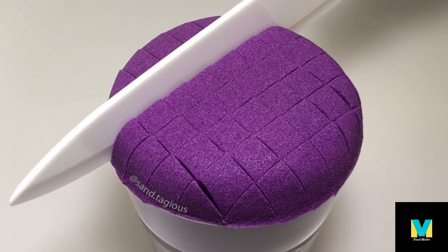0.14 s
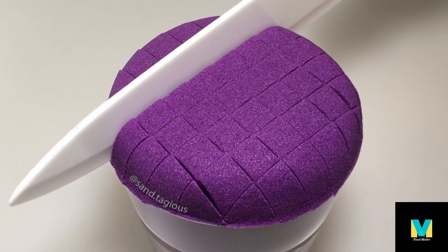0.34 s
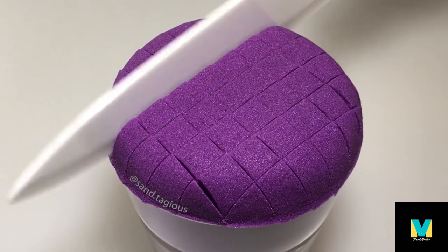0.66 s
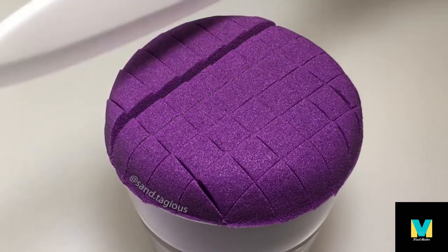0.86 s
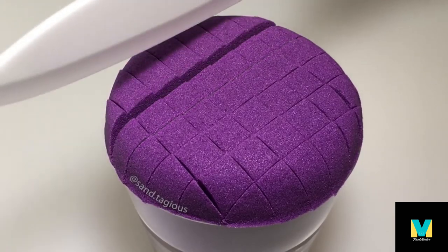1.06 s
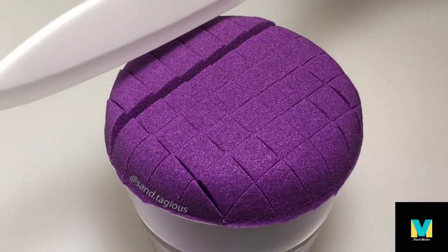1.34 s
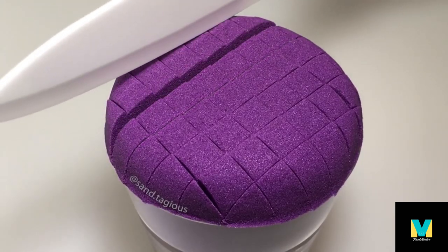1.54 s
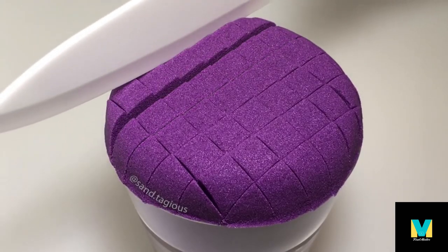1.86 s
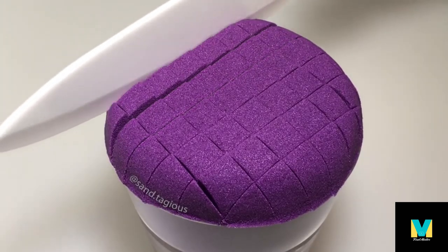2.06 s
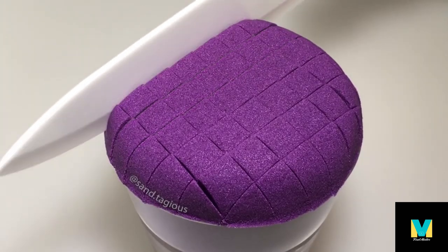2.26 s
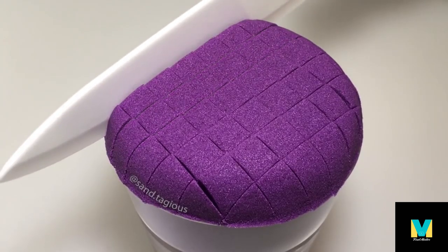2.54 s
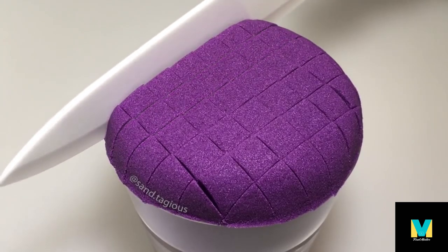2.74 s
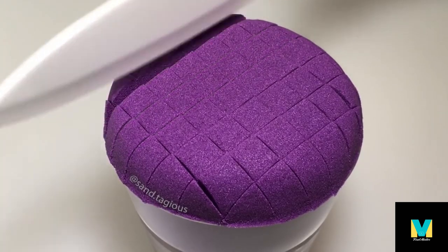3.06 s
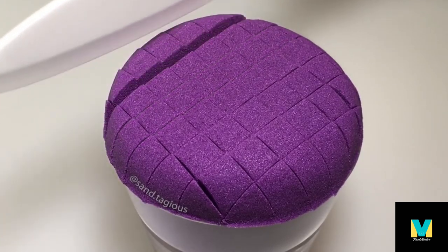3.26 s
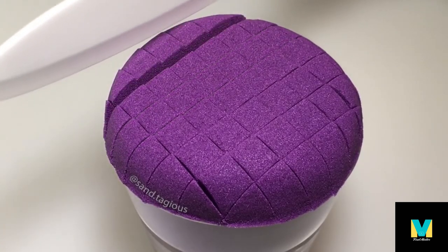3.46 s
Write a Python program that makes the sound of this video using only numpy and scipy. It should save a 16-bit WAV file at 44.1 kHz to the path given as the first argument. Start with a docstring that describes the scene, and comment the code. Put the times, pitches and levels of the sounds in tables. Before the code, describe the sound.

A plastic knife cuts gritty mouldable sand twice, ending in sharp ticks on a cup rim.

```python
"""A quiet small room: a plastic knife presses twice through a cake of mouldable sand on a plastic cup, close up.
Each cut layers a hiss of coloured random grains over a crunch of small slips through a moving resonance.
Filtered clicks and sprays make the rim ticks; soft pushes into decaying modes make the knocks, each with a thud.
Grains also rub faint ringing from the blade as it scrapes. Shaped noise makes the room tone and the deep air.
"""
import sys
import numpy as np
from scipy import signal
from scipy.fft import rfft, irfft, next_fast_len
from scipy.io import wavfile

SR = 44100
rng = np.random.default_rng(int(sys.argv[2]) if len(sys.argv) > 2 else 0)


def wav_record(signal):
    """Record a signal, one row per channel, as 16-bit PCM in the file named by sys.argv[1]."""
    frames = np.transpose(np.atleast_2d(signal))
    bounded = np.clip(frames, -1, 1)
    # unit amplitude maps onto the largest positive 16-bit level
    quanta = np.round(bounded * 32767).astype(np.int16)
    wavfile.write(sys.argv[1], SR, quanta)


N = 160965   # length [samples]
T = np.arange(N) / SR   # time [s]


def from_db(db):
    """Decibels to amplitude gain."""
    return 10 ** (np.asarray(db) / 20)


def rms_one(x):
    """Scale to rms 1."""
    return x / np.sqrt(np.mean(x ** 2) + 1e-20)


def low_pass(x, hz, order=2):
    """Butterworth low-pass."""
    return signal.sosfilt(signal.butter(order, hz, fs=SR, output="sos"), x + 1e-18)


def colour(x, spectrum):
    """Give a steady signal a spectrum, interpolated over log frequency; rms 1."""
    hz, db = np.transpose(spectrum)
    size = next_fast_len(N)
    f = np.maximum(np.arange(size // 2 + 1) * SR / size, .1)
    gain = from_db(np.interp(np.log(f), np.log(hz), db))
    return rms_one(irfft(rfft(x, size) * gain, size)[:N])


def wander(hz):
    """Smooth random motion below a cutoff; spread about 1, extremes clipped."""
    return np.clip(rms_one(low_pass(rng.standard_normal(N), hz)), -2.3, 2.3)


def grains(per_s, spread_db):
    """Random clicks of uneven size and sign, with the same mean power at any rate."""
    chance = np.clip(per_s / SR, 1e-3, 1)
    sizes = from_db(spread_db * np.minimum(rng.exponential(1, N), 5))
    signed = sizes * rng.choice([-1, 1], N)
    happens = rng.random(N) < chance
    return rms_one(signed * happens / np.sqrt(chance))


def clicks(times, db):
    """One single-sample click at each time."""
    out = np.zeros(N)
    out[(np.asarray(times) * SR).astype(int)] = from_db(db)
    return out


def ring(x, modes):
    """Each click sets a bank of decaying sine modes ringing."""
    out = 0
    for hz, db, t60 in modes:
        r = np.exp(-np.log(1000) / (t60 * SR))
        w = 2 * np.pi * hz / SR
        mode = signal.lfilter([0, np.sin(w)], [1, -2 * r * np.cos(w), r * r], x + 1e-18)
        out = out + from_db(db) * mode
    return out


def rubbed(drive, gain, modes):
    """Modes driven by grains under a stroke; they ring on after it."""
    return ring(drive * gain, modes) / np.std(ring(drive, modes))


def resonance(x, hz, width_hz, size=128):
    """A two-pole resonance whose centre follows a curve, updated block by block."""
    out, state = np.zeros(N), np.zeros(2)
    r = np.exp(-np.pi * width_hz / SR)
    for i in range(0, N, size):
        poles = [1, -2 * r * np.cos(2 * np.pi * hz[i] / SR), r * r]
        out[i:i + size], state = signal.lfilter([1, 0, -1], poles, x[i:i + size], zi=state)
    return out


# slow air movement: (time [s], level [dB])
AIR_LEVEL = [(0, -34), (.6, -21), (1.1, -32), (1.6, -41), (2.1, -25.5), (2.5, -28), (3, -22), (3.3, -37),
             (3.65, -31)]
# spectrum of the air: (frequency [Hz], relative level [dB])
AIR_SPECTRUM = [(1, -9.5), (3.5, -2), (8, -7), (20, -31.5), (40, -40.5), (70, -48.5), (150, -69.5),
                (1000, -120)]
# spectrum of the quiet room: (frequency [Hz], relative level [dB])
ROOM_TONE_SPECTRUM = [(20, 1.5), (45, 1), (100, -14), (200, -20), (400, -38), (700, -37), (2000, -42),
                      (6000, -45.5), (11000, -41.5), (16000, -51.5)]
ROOM_TONE_DB, AIR_FADE_S = -58.5, .12


def background():
    """Steady room tone, and the deep sway of air at the microphone, eased in and out."""
    to_nearest_end = np.minimum(T, T[-1] - T)
    ease = np.sin(np.pi / 2 * np.minimum(to_nearest_end / AIR_FADE_S, 1)) ** 2
    sway = from_db(np.interp(T, *np.transpose(AIR_LEVEL)))
    air = ease * sway * colour(rng.standard_normal(N), AIR_SPECTRUM)
    return air + from_db(ROOM_TONE_DB) * colour(rng.standard_normal(N), ROOM_TONE_SPECTRUM)


# faint shifts of the grip, as modes: (frequency [Hz], relative level [dB], t60 [s])
HANDLING_MODES = [(70, -6.5, .06), (135, 2, .05), (215, -13, .04), (350, -7, .1), (430, -9.5, .05),
                  (865, -19.5, .12)]
HANDLING_PER_S, HANDLING_SPREAD_DB = 150, 5
HANDLING_START_DB, HANDLING_SETTLES_DB_PER_S = -69, 1.3


def handling():
    """Faint dull bumps of the hand on the knife, ringing low modes and slowly settling."""
    bumps = low_pass(ring(grains(HANDLING_PER_S, HANDLING_SPREAD_DB), HANDLING_MODES), hz=885)
    return from_db(HANDLING_START_DB - HANDLING_SETTLES_DB_PER_S * T) * rms_one(bumps)


# grain rate: a floor, plus a part given at the reference level that follows force to a power
GRAIN_REF_DB, GRAIN_FLOOR_PER_S, GRAINS_PER_S = -40, 4000, 28000
GRAIN_RATE_LAW, GRAIN_SPREAD_DB = .8, 4.1
# clumping: depth at the reference level, and extra depth per dB of lighter touch
CLUMPS_HZ, CLUMP_DB, CLUMP_GROWTH = 220, .9, .053
WAVER_HZ, WAVER_DB = 22, 2.28   # unsteady hand


def grit(gain):
    """Grains shearing past the blade: dense and even under a hard stroke, sparse and clumped under a light one."""
    force = gain / from_db(GRAIN_REF_DB)
    lightness_db = np.clip(-20 * np.log10(force + 1e-9), 0, 30)
    depth = CLUMP_DB + CLUMP_GROWTH * lightness_db
    power_match_db = depth ** 2 * np.log(10) / 20   # deeper clumps keep the same mean power
    clumps_db = depth * wander(CLUMPS_HZ) - power_match_db
    unsteady = from_db(clumps_db + WAVER_DB * wander(WAVER_HZ))
    rate = GRAINS_PER_S * force ** GRAIN_RATE_LAW + GRAIN_FLOOR_PER_S
    return unsteady * grains(rate, GRAIN_SPREAD_DB)


# the two cuts: (time [s], grain hiss level [dB], crunch level [dB], crunch resonance [Hz])
FIRST_STROKE = [(0, -46.5, -40, 405), (.05, -52, -46, 425), (.11, -49, -42.5, 475),
                (.19, -53.5, -47.5, 452), (.22, -51, -46.5, 433), (.28, -52.5, -47, 445),
                (0.294, -50, -40.5, 490), (.315, -88, -58, 460)]
SECOND_STROKE = [(1.69, -99, -64, 450), (1.76, -74, -66.5, 457), (1.84, -75, -62.5, 425),
                 (1.93, -57, -55, 420), (2.05, -44.5, -44, 305), (2.16, -40.5, -39, 290),
                 (2.24, -39, -36, 400), (2.33, -41, -38.5, 445), (2.4, -45.5, -43, 440),
                 (2.52, -50.5, -50, 454), (2.54, -50, -39, 460), (2.57, -81, -70, 490),
                 (2.63, -80, -77.5, 480)]
# width of the crunch resonance: first cut, second cut [Hz]
CRUNCH_WIDTHS = [47, 128]
# broad shudder of the cake against the crunch, before its pitch loss: first cut, second cut [dB]
CAKE_LEVELS = [-10, 1.5]
# high blade ring against the hiss: first cut, second cut [dB]
CUT_RING_LEVELS = [-11, -8.5]
# spectra of the shearing grains and the shuddering cake: (frequency [Hz], relative level [dB])
HISS_SPECTRUM = [(500, -30.5), (950, -21), (1130, -4.5), (1700, -11), (2300, -5), (3000, -7.5), (4400, -8),
                 (5300, -3.5), (7000, -1.5), (9700, 1.5), (14000, 2.5), (16000, -5)]
CAKE_SPECTRUM = [(30, 1), (70, 1.5), (130, 1.5), (190, -5), (290, -1), (480, -9), (600, -16.5), (780, -9),
                 (930, -40), (2000, -51)]
# high ringing of the blade: (frequency [Hz], relative level [dB], t60 [s])
BLADE_HIGH_MODES = [(2386, -7, 0.019), (3590, -8, .03), (5233, -3, 0.029), (6010, -6.5, .035),
                    (7170, -7, 0.025), (8224, -0.5, .04), (9930, -3, 0.043), (12300, -8, .02),
                    (13600, 1, 0.013)]
SLIPS_PER_S, SLIP_SPREAD_DB = 1800, 3.5
CAKE_LOSS_DB_PER_HZ = .018   # the shudder fades as the resonance climbs


def cut(curve, width_hz, cake_db, ring_db):
    """The blade sinks in: grain hiss, and small slips that shake the cake and its moving resonance."""
    s, hiss_db, crunch_db, hz = np.transpose(curve)
    # silent outside the stroke
    hiss = from_db(np.interp(T, s, hiss_db, left=-np.inf, right=-np.inf))
    push = from_db(np.interp(T, s, crunch_db, left=-np.inf, right=-np.inf))
    sand = hiss * colour(grit(hiss), HISS_SPECTRUM)
    blade = from_db(ring_db) * rubbed(grit(hiss), hiss, BLADE_HIGH_MODES)
    slips = grains(SLIPS_PER_S, SLIP_SPREAD_DB)
    crunch = rms_one(low_pass(resonance(slips, np.interp(T, s, hz), width_hz), hz=700, order=4))
    cake_loss_db = CAKE_LOSS_DB_PER_HZ * np.interp(T, s, hz - hz.min())
    cake = from_db(cake_db - cake_loss_db) * colour(grains(SLIPS_PER_S, SLIP_SPREAD_DB), CAKE_SPECTRUM)
    return sand + blade + push * (crunch + cake)


# light scrapes of the free blade; rise and fall each span 20 dB, and the grain level is before its trims:
# (loudest at [s], rise [s], fall [s], grain level [dB], blade hum level [dB], rim level [dB])
SCRAPE_STROKES = [(.302, .01, .008, -70, -45, -58), (0.798, 0.06, 0.01, -73, -85, -60),
                  (0.836, 0.02, 0.005, -42.5, -45, -40), (0.885, 0.0039, 0.011, -47.5, -43, -42),
                  (1.703, 0.0029, 0.03, -66, -53, -63), (1.715, 0.0034, 0.008, -50, -43, -66),
                  (1.771, 0.0024, 0.035, -60.5, -51, -69), (1.885, 0.046, 0.09, -60.5, -57.5, -89),
                  (2.785, 0.15, 0.12, -65, -90, -58), (3.125, 0.045, 0.023, -53, -50, -54),
                  (3.148, 0.032, 0.013, -52, -44, -57)]
# low ringing of the blade, then ringing of the rim and the cup: (frequency [Hz], relative level [dB], t60 [s])
BLADE_LOW_MODES = [(347, -4, 0.13), (465, 3.5, 0.046), (512, -5.5, 0.15), (815, 5, 0.098), (950, 1, 0.022)]
RIM_MODES = [(449, -3, .02), (680, -9, .015), (1130, -7, .02), (1330, -4, .016), (2030, -7, .012),
             (3100, -7, .005), (4880, -4, .006)]
CUP_MODES = [(342.6, -7, .05), (435, -3.5, 0.052), (527, -3.5, 0.017), (648, -7, 0.038)]
SCRAPE_RING_DB, SCRAPE_HISS_DB = -2.5, 3   # trims on the grain level


def scrapes():
    """The blade brushes the walls of the slit or the rim; the grains set blade, rim and cup ringing."""
    hiss, hum, rim = 0, 0, 0
    for s, rise, fall, grain_db, hum_db, rim_db in SCRAPE_STROKES:
        distance = np.maximum((s - T) / rise, (T - s) / fall)
        stroke = from_db(-20 * np.minimum(distance, 10))
        hiss = hiss + from_db(grain_db) * stroke
        hum = hum + from_db(hum_db) * stroke
        rim = rim + from_db(rim_db) * stroke
    sand = grit(hiss)
    brush = from_db(SCRAPE_HISS_DB) * hiss * colour(sand, HISS_SPECTRUM)
    blade_high = from_db(SCRAPE_RING_DB) * rubbed(sand, hiss, BLADE_HIGH_MODES)
    blade_low = rubbed(sand, hum, BLADE_LOW_MODES)
    rim_and_cup = low_pass(rubbed(sand, rim, RIM_MODES + CUP_MODES), hz=1300, order=3)
    return brush + blade_high + blade_low + rim_and_cup


# soft knocks on the cup:
# (time [s], ring level [dB], thud level [dB], thud frequency [Hz], thud t60 [s], contact time [s])
CUP_KNOCKS = [(.2975, -36, -27, 480, .014, .0011), (.306, -38, -29, 105, .05, .002),
              (0.433, -52, -52, 110, .038, 0.0014), (0.636, -37.5, -27.5, 350, .038, 0.00125),
              (0.734, -57, -70, 200, .038, 0.0018), (.882, -34, -24, 105, .038, 0.0022),
              (0.992, -48, -63, 120, .038, 0.0024), (1.145, -58, -61.5, 149, .038, 0.0013),
              (2.152, -44, -19, 266, .03, 0.0022), (2.5512, -28, -20, 135, .018, 0.001),
              (2.553, -40, -29, 90, .08, .003), (2.693, -43, -46, 250, .03, 0.001),
              (2.8738, -35, -21, 410, .013, 0.0014), (2.877, -50, -33, 102, .09, .003),
              (2.964, -47.5, -37.5, 100, .038, 0.002)]


def knocks():
    """Cushioned bumps ring the sand-filled cup, each with a short pitched thud; longer contact is duller."""
    out = 0
    for s, cup_db, thud_db, thud_hz, thud_t60, contact_s in CUP_KNOCKS:
        push = np.sin(np.pi * np.clip((T - s) / contact_s, 0, 1)) ** 2
        push = push / push.sum()
        cup = from_db(cup_db) * ring(push, CUP_MODES)
        thud = ring(push, [(thud_hz, thud_db, thud_t60)])
        out = out + cup + thud
    return out


RIM_FOCUS_DB = 6   # loss per octave away from the most excited pitch


def rim_ring(x, excited_hz):
    """The point of contact favours the rim modes near one pitch."""
    focused = []
    for hz, db, t60 in RIM_MODES:
        octaves_away = abs(np.log2(hz / excited_hz))
        focused.append((hz, db - RIM_FOCUS_DB * octaves_away, t60))
    return ring(x, focused)


# hard ticks of the blade on the rim:
# (time [s], crack level [dB], crack centre [Hz], rim ring level [dB], most excited frequency [Hz])
RIM_TICKS = [(.3032, -51, 3000, -35.5, 2050), (.633, -48, 8950, -60, 900), (1.812, -43, 12000, -70, 900),
             (1.8397, -40, 13000, -73, 900), (2.5421, -6, 8000, -25, 700), (2.5485, -8, 8000, -27, 1400),
             (2.5556, -22.5, 7500, -31, 1100), (2.6417, -21.5, 8600, -35, 1100),
             (2.8726, -14.5, 12400, -27, 1450)]
CRACK_WIDTH_HZ = 15000
CRUMBLE_S, CRUMBLE_DB = .00096, -8   # decay time constant of the spray; its level against the crack
TICK_BLADE_DB = -30   # the blade's low ring against the rim's


def ticks():
    """The edge snaps onto the rim: a sharp crack, a short spray of crushed grains, and the ring of rim and blade."""
    out, r = 0, np.exp(-np.pi * CRACK_WIDTH_HZ / SR)
    for s, db, hz, rim_db, excited_hz in RIM_TICKS:
        decay = (T > s) * np.exp(-np.minimum(abs(T - s) / CRUMBLE_S, 20))
        spray = rng.standard_normal(N) * decay
        snap = clicks([s], db) + from_db(db + CRUMBLE_DB) * spray
        poles = [1, -2 * r * np.cos(2 * np.pi * hz / SR), r * r]
        crack = signal.lfilter([.5, 0, -.5], poles, snap + 1e-18)
        out = out + crack + rim_ring(clicks([s], rim_db), excited_hz)
    s, _, _, rim_db, _ = np.transpose(RIM_TICKS)
    return out + ring(clicks(s, rim_db + TICK_BLADE_DB), BLADE_LOW_MODES)


ROOM_DB, ROOM_SPLIT_HZ = -14, 670
ROOM_T60_S, ROOM_LOW_T60_S = .13, .16   # above and below the split


def room(x):
    """A short diffuse tail of decaying noise in which the lows last longer."""
    t = T[:SR // 2]
    noise = rng.standard_normal(len(t))
    low = low_pass(noise, ROOM_SPLIT_HZ)
    high = signal.sosfilt(signal.butter(2, ROOM_SPLIT_HZ, "high", fs=SR, output="sos"), noise)
    low_tail = low * np.exp(-np.log(1000) * t / ROOM_LOW_T60_S)
    high_tail = high * np.exp(-np.log(1000) * t / ROOM_T60_S)
    tail = (low_tail + high_tail) * (t > .002)   # starts just after the direct sound
    return from_db(ROOM_DB) * signal.fftconvolve(x, tail / np.linalg.norm(tail))[:N]


def scene():
    """Knife, sand and cup in the room."""
    strokes = zip((FIRST_STROKE, SECOND_STROKE), CRUNCH_WIDTHS, CAKE_LEVELS, CUT_RING_LEVELS)
    cuts = sum(cut(*stroke) for stroke in strokes)
    knife = handling() + cuts + scrapes() + knocks() + ticks()
    return (background() + knife + room(knife))[None]


CUTOFF_HZ = 15900


def record(dry):
    """A steep elliptic low-pass cuts the top."""
    return signal.sosfilt(signal.ellip(10, .1, 80, CUTOFF_HZ, fs=SR, output="sos"), dry)


dry = scene()
out = record(dry)
wav_record(out)
```